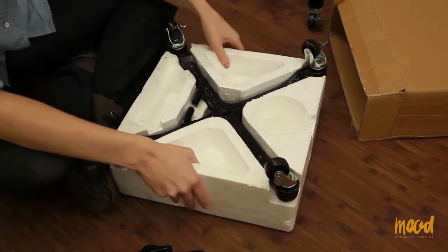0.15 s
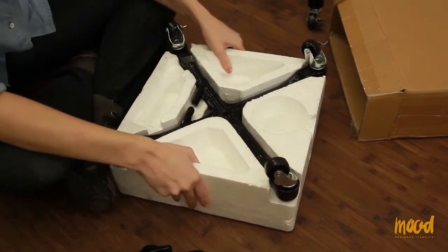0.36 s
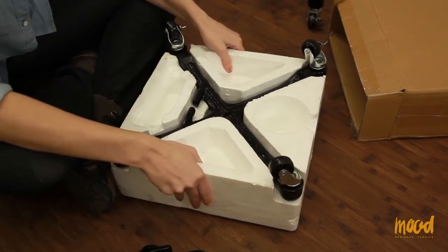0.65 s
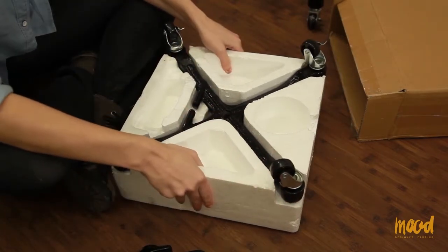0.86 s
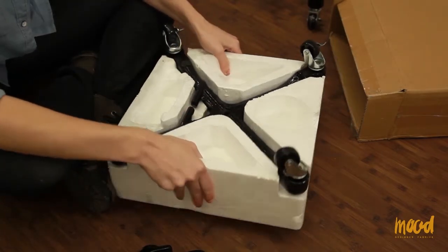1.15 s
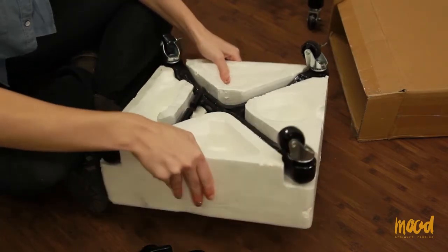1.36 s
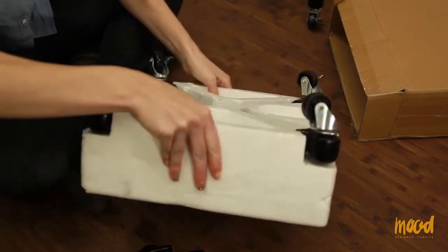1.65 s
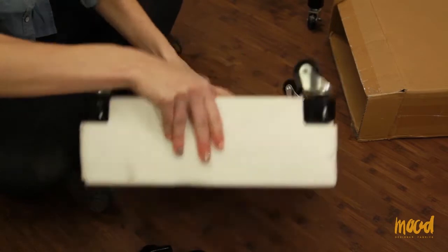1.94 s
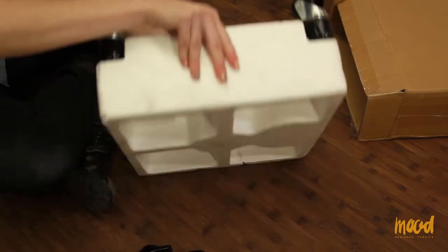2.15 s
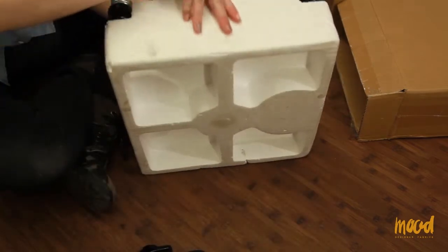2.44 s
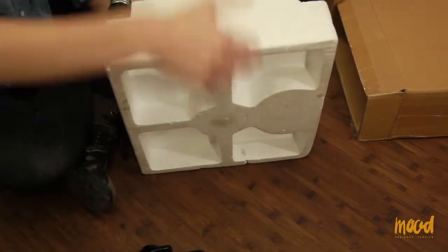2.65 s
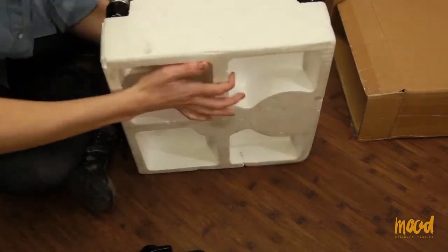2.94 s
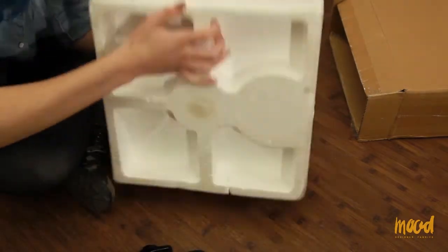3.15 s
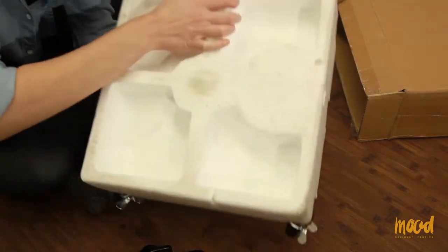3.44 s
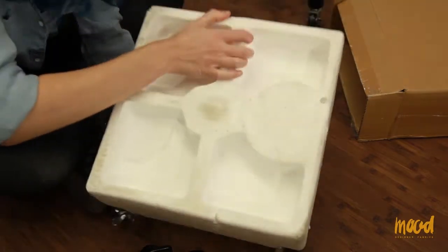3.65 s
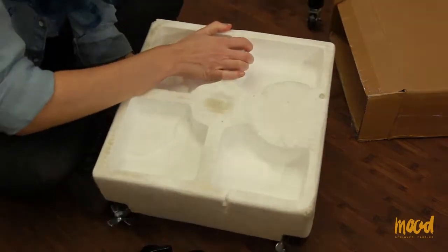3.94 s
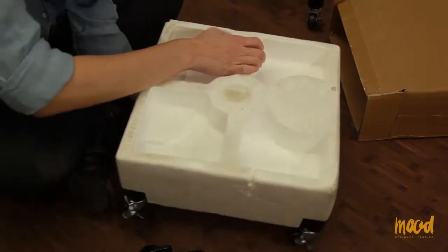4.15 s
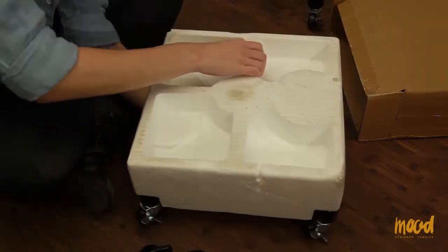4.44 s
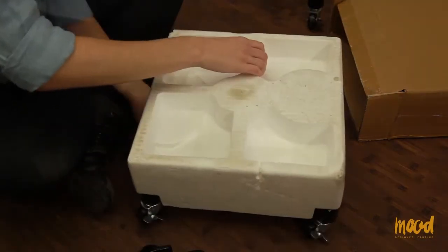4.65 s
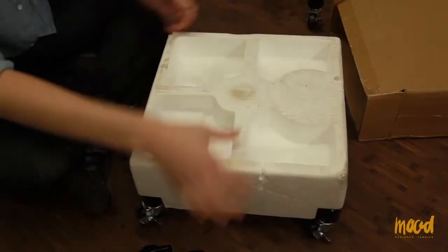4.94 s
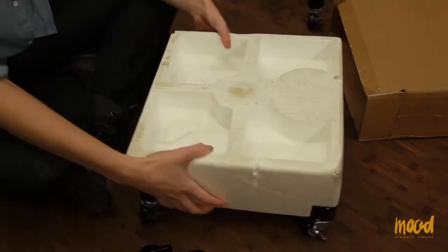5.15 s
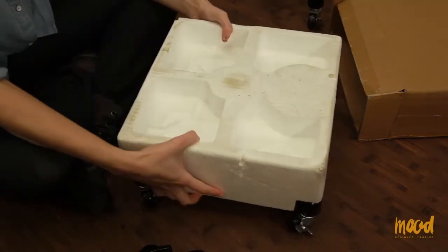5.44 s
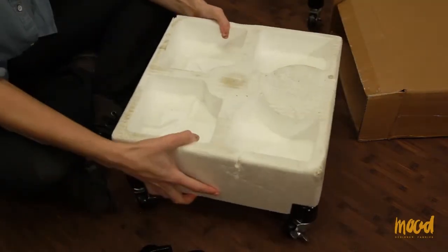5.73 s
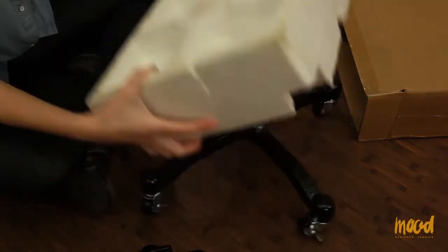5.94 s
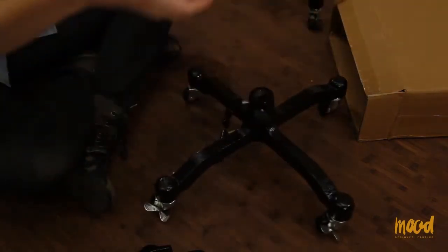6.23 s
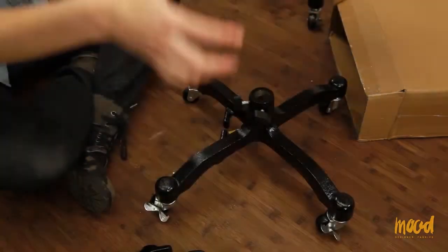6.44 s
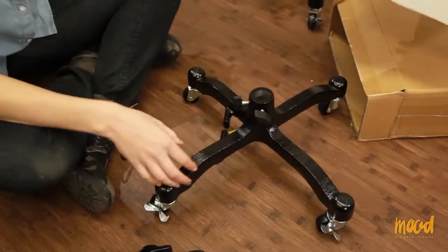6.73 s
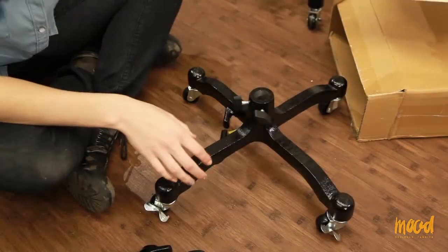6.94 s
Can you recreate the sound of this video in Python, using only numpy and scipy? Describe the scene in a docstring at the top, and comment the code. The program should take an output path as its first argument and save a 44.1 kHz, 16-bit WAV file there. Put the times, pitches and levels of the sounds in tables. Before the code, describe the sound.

A close view of handling in a quiet, lightly reflective room with steady low rumble and faint hiss. From 0 to 1.4 seconds, foam rubs dryly, with a sharp hollow clack near 0.4 and another, double-edged, near 0.9. At 1.8 a strong hollow knock starts the turning: uneven gritty scraping, brief squeaks near 2.3 to 2.6, and low floor thumps near 2.4 and 2.8. Rubbing swells at 3.05, a sharp tick falls at 3.4, then hard clacks at 3.6 and 4.07 as the load lands on the boards. Softer scuffing builds until 4.7. A dull bump at 5.04 begins heavier gripping and creaky rubbing, with a little squeak near 5.4, rising to a loud hollow pop at 5.85. A light swish follows at 6.2, a tiny tap at 6.7, then faint brushing to about 7.1.

```python
"""A quiet room: hands turn over a foam block packed round a wheeled base and lift it off.
Dense random slips hiss on the foam beads, scrape its walls and drum in its hollows.
Knocks ring its modes; ticks are short noise bursts, squeaks are gliding whistles; boards rumble and thud.
Echoes and a steady room tone lie round it. The opening repeats a stretch of handling heard again later."""
import sys
import numpy as np
from scipy import signal
from scipy.fft import rfft, irfft, next_fast_len
from scipy.io import wavfile
from scipy.ndimage import uniform_filter1d

SR = 44100
rng = np.random.default_rng(int(sys.argv[2]) if len(sys.argv) > 2 else 0)


def wav_record(signal):
    """Record a signal, one row per channel, as 16-bit PCM in the file named by sys.argv[1]."""
    frames = np.transpose(np.atleast_2d(signal))
    bounded = np.clip(frames, -1, 1)
    # unit amplitude maps onto the largest positive 16-bit level
    quanta = np.round(bounded * 32767).astype(np.int16)
    wavfile.write(sys.argv[1], SR, quanta)


N = 313063
SIZE = next_fast_len(N)
HZ = np.fft.rfftfreq(SIZE, 1 / SR)

# modes of the foam block: pitch_hz, level_db, t60_s
BLOCK_MODES = [(127, -8.5, 0.18), (248, -5, 0.078), (297.3, 3, 0.12), (332.7, 3, 0.2), (356.3, 3, 0.12),
               (435, -0.5, 0.05), (480.7, 0, 0.1), (579, -3.5, 0.061), (647, -4.5, 0.089), (704.5, -2, 0.1),
               (763.5, -3.5, 0.087), (874.6, 1.5, 0.056), (1005, -2, 0.051), (1132, 2.5, 0.061),
               (1377, -3.5, 0.039), (1790, -4, 0.22), (1940, -10, 0.025), (2760, -19.5, 0.09),
               (3220, 2, 0.028)]
# colour of the rubbed face, by posture of the block: pitch_hz, level_db_per_hz
ON_EDGE = [(320, -75), (550, 8), (789, 7.5), (1020, 1.5), (1160, 7.5), (1290, -1.5), (1430, 2), (2080, -5),
           (2520, -3.5), (3810, -15.5), (4740, -12), (6890, -8), (8690, -12), (11000, -8.5), (12000, -13.5),
           (15600, -49), (22000, -120)]
LAID_DOWN = [(320, -36), (550, -12.5), (730, -4.5), (810, -9), (1210, -2), (1710, -7), (2590, -9),
             (2830, -8), (3660, -15), (4440, -12), (5060, -28.5), (5460, -18.5), (7260, -28), (10400, -27),
             (12000, -27), (15600, -59), (22000, -120)]
SLID = [(320, -31), (550, 14), (886, 5.5), (958, 3), (1090, 4), (1800, -9.5), (1950, -8), (2330, -13),
        (2650, -9.5), (4010, -16.5), (4930, -18.5), (5680, -16), (7350, -17), (11000, -15.5), (12000, -23),
        (15600, -53), (22000, -120)]
LIFTED = [(320, -30), (550, 11), (602, 11), (685, 6.5), (910, 9), (1010, 0), (1120, 5), (1500, -6.5),
          (1760, -4.5), (2940, -11), (3570, -16.5), (4740, -21), (8050, -16.5), (11300, -11.5),
          (12000, -18), (15600, -52), (22000, -120)]


def gain_of(db):
    """Decibels to an amplitude factor."""
    return 10 ** (np.asarray(db) / 20)


def evened(x):
    """Scales to rms 1."""
    return x / np.sqrt(np.mean(x ** 2) + 1e-20)


def add(mix, start_s, sound):
    """Adds a sound to the mix in place, cut at the end."""
    part = mix[round(start_s * SR):][:len(sound)]
    part += sound[:len(part)]


def read(points):
    """A (Hz, dB) curve as a gain for every frequency, interpolated over log frequency."""
    point_hz, point_db = np.transpose(points)
    return gain_of(np.interp(np.log(HZ + 1), np.log(point_hz + 1), point_db))


def band(spectrum, lo_hz, hi_hz):
    """One band of a spectrum as sound of rms 1."""
    edges = np.sqrt((1 + (lo_hz / (HZ + 1)) ** 8) * (1 + (HZ / hi_hz) ** 8))
    return evened(irfft(spectrum / edges, SIZE)[:N])


def resonate(x, hz, width_hz):
    """Resonance of gain 1 on a moving pitch: shift it to zero, smooth, shift back."""
    turn = np.exp(2j * np.pi * np.cumsum(hz * np.ones(len(x))) / SR)
    pole = np.exp(-np.pi * width_hz / SR)
    smooth = signal.lfilter([1 - pole], [1, -pole], x / turn + 1e-18)
    return 2 * (turn * smooth).real


def swells(rows, levels_db, rest_db, swell_db):
    """Each row climbs swell_db in its rise and drops it in its fall; powers add over a rest level."""
    curve = 1.24  # above 1: dwells near the top, lets go quickly
    t = np.arange(0, N + 64, 64) / SR
    peak_s, rise_s, fall_s = (c[:, None] for c in np.transpose(rows)[:3])
    distance = np.maximum((peak_s - t) / rise_s, (t - peak_s) / fall_s)
    shape_db = -swell_db * distance ** curve
    power = (gain_of(levels_db[:, None] + shape_db) ** 2).sum(0) + gain_of(rest_db) ** 2
    return np.interp(np.arange(N) / SR, t, np.sqrt(power))


def room_tone():
    """Steady shaped noise: rumble of the building and a faint hiss."""
    # spectrum: pitch_hz, level_db_per_hz
    room_curve = [(12, -51), (20, -5), (59, 2), (159, -2), (197, -6), (226, -63), (321, -19), (420, -31),
                  (480, -12), (564, -15), (5000, -23), (11200, -32), (12500, -74), (16200, -97),
                  (22000, -120)]
    level_db = -49
    noise = rfft(rng.standard_normal(SIZE))
    return gain_of(level_db) * evened(irfft(noise * read(room_curve), SIZE)[:N])


def echoes(x, t60_s, dull_hz):
    """Reflections from floor, box and walls: sparse decaying taps, duller than the direct sound."""
    t = np.arange(SR // 2) / SR
    taps = rng.choice([-1., 1.], len(t)) * (rng.random(len(t)) < 2000 / SR)  # 2000 per second
    taps = taps * gain_of(-60 * t / t60_s) * (t > .003)
    taps = signal.lfilter(*signal.butter(1, dull_hz, fs=SR), taps)
    return signal.fftconvolve(x, taps / np.linalg.norm(taps))[:N]


def boards():
    """Low noise swells as the load rolls and lands on the floor boards."""
    # weight on the boards: heaviest_s, rise_s, fall_s, rumble_db
    rolls = [(1.43, .05, .06, -45), (1.53, 0.026, .08, -41.5), (1.78, 0.12, 0.12, -43),
             (1.94, 0.12, 0.035, -41), (2.33, 0.031, 0.031, -34.5), (2.41, 0.023, .3, -33),
             (2.81, 0.05, 0.056, -26.5), (3.05, 0.39, 0.078, -41), (3.23, 0.045, 0.033, -45),
             (3.6, 0.037, 0.014, -30), (3.7, .03, 0.05, -46), (3.95, 0.036, .3, -54.5),
             (4.079, 0.022, 0.014, -27.5), (4.42, 0.052, 0.11, -38.5), (4.64, 0.23, 0.32, -44),
             (5.05, 0.043, 0.12, -31.5), (5.25, 0.036, 0.12, -43), (5.49, 0.082, 0.068, -38),
             (5.6, 0.05, 0.29, -45), (5.85, 0.049, 0.044, -35)]
    rumble = band(rfft(rng.standard_normal(SIZE)), 76.0, 282.0)
    return swells(rolls, np.transpose(rolls)[3], rest_db=-59, swell_db=20) * rumble


def thud(level_db, pitch_hz, t60_s):
    """The boards flex and settle: a decaying sine with a soft onset."""
    t = np.arange(SR // 3) / SR
    onset = np.minimum(t / 0.011, 1)
    return gain_of(level_db - 60 * t / t60_s) * np.sin(2 * np.pi * pitch_hz * t) * onset


def squeak(length_s, from_hz, mid_hz, to_hz, level_db):
    """Slips lock into a rough whistle that follows sliding speed and clings to steps of the surface."""
    t = np.arange(0, length_s, 1 / SR)
    glide_hz = np.interp(t / length_s, [0, .5, 1], [from_hz, mid_hz, to_hz])
    step = 2 * np.pi * (glide_hz - 7200) / 1500
    hz = glide_hz - 200 * np.sin(step)
    cling_db = 2.0 * (np.cos(step) - 1)  # loudest where it clings
    rough = resonate(resonate(rng.standard_normal(len(t)), hz, 1000.0), hz, 1000.0)
    whistle = evened(rough) + .8 * np.sin(2 * np.pi * np.cumsum(hz) / SR)
    return gain_of(level_db + cling_db) * evened(whistle) * signal.windows.tukey(len(t), .4)


def tick(peak_db, pitch_hz):
    """A sharp slip or tap: a noise burst coloured by a small patch of surface, with a dry click."""
    t60_s, click_t60_s = 0.014, 0.0023
    snap_share, click_share = 0.24, 0.48
    t = np.arange(SR // 20) / SR
    noise = np.diff(rng.standard_normal(len(t) + 1))
    snap = evened(resonate(resonate(noise, pitch_hz, 3200.0), pitch_hz, 5300.0))
    tone = evened(resonate(resonate(noise, pitch_hz, 460.0), pitch_hz, 1060.0))
    burst = (snap_share * snap + tone) * gain_of(-60 * t / t60_s) * np.minimum(t / 0.00036, 1)
    click = (2 * rng.random(len(t)) - 1) * gain_of(-60 * t / click_t60_s)
    burst = burst / abs(burst).max() + click_share * click
    return gain_of(peak_db) * burst / abs(burst).max()


def knock(level_db, hollow_hz, wall_hz, wall_db, crack_db, ring):
    """A push rings the modes near the struck hollow and wall; the skin of the foam cracks briefly."""
    focus_db_per_octave, free_share = 30.5, 0.2
    t = np.arange(SR // 3) / SR
    hz, mode_db, t60_s = (c[:, None] for c in np.transpose(BLOCK_MODES))

    def near(spot_hz):
        """Modes fade with distance in octaves, up to 1.2."""
        return gain_of(-focus_db_per_octave * np.minimum(abs(np.log2(hz / spot_hz)), 1.2))

    share = near(hollow_hz) + gain_of(wall_db) * near(wall_hz)
    side = (-1) ** np.arange(len(hz))[:, None]  # neighbouring modes swing opposite ways
    fall_db = -60 * t / (t60_s * ring)
    decay = gain_of(2.56 * fall_db) + free_share * gain_of(fall_db)  # damped by contact, plus free ring
    modes = (side * share * gain_of(mode_db) * decay * np.sin(2 * np.pi * hz * t)).sum(0)
    modes = modes * np.minimum(t / 0.00025, 1)
    # the knock carries nothing below about 90 Hz
    modes = signal.lfilter(*signal.butter(2, 90, "high", fs=SR), modes)
    crack = resonate(rng.standard_normal(len(t)), 1380.0, 930.0)
    crack = crack * gain_of(-60 * t / 0.062) * np.minimum(t / 0.001, 1)
    return gain_of(level_db) * (modes / abs(modes).max() + gain_of(crack_db) * crack / abs(crack).max())


def slips(per_s, spread_db, flutter_db, flutter_ms):
    """Beads let go at random moments with uneven force, while the grip flutters."""
    force = gain_of(spread_db * np.minimum(rng.exponential(1, N), 3.0)) * rng.standard_normal(N)
    span = int(flutter_ms * SR / 1000)
    grip = evened(uniform_filter1d(uniform_filter1d(rng.standard_normal(N), span), span))
    return force * (rng.random(N) < per_s / SR) * gain_of(flutter_db * grip)


def patchy(x, depth_db, wide_hz, long_ms):
    """Each patch of foam under the contact favours other pitches for a moment."""
    hz, t, spectra = signal.stft(x, SR, nperseg=512, noverlap=384)
    field = rng.standard_normal(spectra.shape[::-1]).T
    for _ in range(2):
        field = uniform_filter1d(field, max(int(wide_hz / hz[1]), 1), 0)
        field = uniform_filter1d(field, max(int(long_ms / 1000 / t[1]), 1), 1)
    coloured = spectra * gain_of(depth_db * evened(field))
    return signal.istft(coloured, SR, nperseg=512, noverlap=384)[1][:N]


def rubbing():
    """One stream of slips drives the beads, the walls and the hollows by changing amounts."""
    # strokes: hardest_s, rise_s, fall_s, pressure_db, then against the pressure: hiss_db, wall_db, hollow_db
    strokes = [(1.451, 0.035, 0.55, -50.5, -2, 3, 4.5), (1.536, 0.011, 0.054, -33, 6.5, -4, 0.5),
               (1.564, 0.033, 0.024, -39.5, 6.5, 1, 7), (1.62, .06, .04, -54, 0, -2, 5),
               (1.656, 0.0069, 0.25, -43.5, -2.5, 6, -12), (1.772, 0.082, 0.041, -32, 3.5, -3.5, 1.5),
               (1.835, .03, 0.17, -36.5, 1, -22, 6), (2.04, 0.29, 0.19, -34.5, -4, -4.5, -6),
               (2.1, 0.13, 0.13, -31.5, 1.5, -5.5, -12), (2.155, 0.09, .03, -36, 1, -2, -3),
               (2.2, 0.092, 0.18, -39.5, -8, -0.5, 2), (2.295, 0.053, 0.059, -29, -1, -1.5, -9),
               (2.329, 0.046, .06, -37.5, -4, 7.5, 7.5), (2.407, .008, .03, -35, -12, 1, -14),
               (2.419, 0.036, 0.036, -35.5, 1, 2, -16), (2.497, 0.13, 0.046, -33, 1, 0.5, -12),
               (2.54, .04, 0.055, -32, -2.5, -14, -1.5), (2.59, 0.042, 0.054, -36, 5.5, -1.5, -6),
               (2.617, 0.02, 0.033, -31, -13, -10, 0), (2.67, 0.057, 0.07, -50, -5, -1, 8.5),
               (2.765, .03, 0.065, -41, -8, 1, 1), (2.812, 0.061, 0.063, -31.5, -2, -2, 2.5),
               (2.91, 0.16, 0.11, -37.5, -2, 0, -8), (2.96, 0.067, 0.093, -46.5, 8.5, -4, 14),
               (3.045, 0.14, 0.074, -28, 1.5, 0, -15), (3.184, 0.17, 0.037, -37, 1.5, 3.5, -0.5),
               (3.273, 0.14, 0.13, -39, 1, 9.5, 5), (3.335, 0.025, 0.018, -53, -2, 17, 6),
               (3.365, 0.022, 0.13, -37, 0.5, 10, 1), (3.428, 0.021, 0.035, -38.5, 1, 16, 4),
               (3.453, 0.038, 0.066, -29, -2, 3.5, -22), (3.487, .04, 0.044, -31, -7.5, -6.5, -23),
               (3.53, 0.022, 0.3, -40, -13.5, 4, -3), (3.629, 0.097, 0.073, -38.5, -0.5, -2, 11.5),
               (3.68, 0.072, 0.074, -41.5, -7, -6, 4), (3.728, 0.11, 0.019, -40, -6, 5, 5),
               (3.865, 0.062, 0.088, -59, -3, 0, 14), (3.97, .08, 0.33, -46.5, -3.5, -0.5, -18),
               (4.035, 0.039, 0.06, -50, -4, 8, 13), (4.16, 0.032, 0.094, -55, 1, 0, 17),
               (4.281, 0.16, 0.38, -38.5, -1.5, -3, 0.5), (4.386, 0.13, 0.073, -43, 2, 11.5, 12.5),
               (4.45, 0.16, 0.2, -39.5, -1, -15, -7), (4.545, 0.28, 0.15, -39.5, 3, 6.5, 2),
               (4.594, 0.12, 0.052, -37.5, 1, 10.5, 9.5), (4.633, 0.13, 0.069, -32.5, 0.5, 3, 0.5),
               (4.697, .006, .02, -41, -3, 17.5, -8), (4.711, 0.037, 0.017, -41, 5, 14.5, -29),
               (4.734, 0.084, 0.044, -48.5, -17, 10.5, 2), (4.885, .2, .2, -56, -16, -17, -17),
               (5.005, 0.0064, 0.16, -35.5, -6.5, -22, -8), (5.044, 0.028, .03, -27.5, -7.5, 1, 5),
               (5.095, 0.038, 0.36, -36.5, -13.5, -13, -4), (5.147, 0.018, 0.042, -30.5, -13, -3, 5),
               (5.12, .02, .02, -43, -10, -7, 14), (5.2, 0.15, 0.28, -41, -6, -17, -9),
               (5.37, 0.17, 0.25, -35, -19, 2, -4), (5.445, 0.12, 0.061, -29, -9, -7, -24),
               (5.487, .03, 0.072, -24.5, -11.5, -0.5, -5.5), (5.626, 0.076, 0.27, -34, -11, -1, -2.5),
               (5.7, 0.057, 0.09, -33.5, -11, -10, -17), (5.8, 0.12, 0.11, -27, -7.5, 1, -7),
               (5.844, 0.064, 0.038, -26, 3.5, -3, -4), (5.915, 0.061, 0.081, -46, -3.5, 13.5, -9),
               (6.01, 0.07, 0.04, -63, 3, 16, -2), (6.11, 0.058, .06, -44, -8, -9, -11.5),
               (6.163, 0.069, 0.085, -33, -1, -7, -23), (6.203, 0.082, 0.026, -36, 0, -3.5, -17),
               (6.25, 0.068, 0.068, -53, -14, 8, -10), (6.37, 0.093, 0.12, -50.5, -20, 2, -14),
               (6.46, 0.17, 0.23, -46, -7.5, -3, -25), (6.6, 0.25, 0.29, -48.5, -7.5, -4, -21),
               (6.696, 0.0031, 0.025, -46.5, 1, 8, -14), (6.85, .02, 0.041, -59, 3, 5, 2),
               (6.9, .07, 0.16, -49.5, -1.5, 0, -8), (6.97, .06, 0.085, -60, -5, 5, 6),
               (7.086, 0.26, 0.049, -45, 0, 6.5, -9)]
    # postures of the block: from_s, face, ribs key, fizz_db against hiss
    postures = [(0, ON_EDGE, "on edge", -2.1), (3.231, LAID_DOWN, "laid down", 0.5), (3.9, SLID, "slid", 2),
                (4.9, LIFTED, "lifted", 2.5), (5.6, LIFTED, "lifted", -1.5),
                (6.26, LIFTED, "lifted", -10.5)]
    # thin ribs that sing out, by posture: pitch_hz, width_hz, gain_db over the face
    ribs = {"on edge": [(2400, 190, -65), (5170, 240, -8), (6600, 83, -2)],
            "laid down": [(2930, 440, -13.5), (4360, 380, -10), (5060, 110, 16), (7800, 300, -6)],
            "slid": [(2920, 380, -29), (4810, 230, 3), (7180, 230, -6)], "lifted": [(2280, 530, -23),
            (3200, 130, -11), (7240, 76, 2), (8370, 160, -2)]}
    # hands at rest: hiss_db, fizz_db, rasp_db, wall_db, hollow_db
    touch_db = [-105, -123, -68, -59.5, -60]
    # climb in a rise, drop in a fall: hiss_db, fizz_db, rasp_db, wall_db, hollow_db
    swell_db = [24.2, 25.5, 25, 30.8, 29.8]
    fizz_db_per_hiss_db = 1.02

    press_db, hiss_db, wall_db, hollow_db = np.transpose(strokes)[3:]
    against_db = [hiss_db, fizz_db_per_hiss_db * hiss_db, 0 * press_db, wall_db, hollow_db]
    hiss, fizz, rasp, wall, hollow = (
        swells(strokes, press_db + part_db, rest_db, climb_db)
        for part_db, rest_db, climb_db in zip(against_db, touch_db, swell_db))

    fine = slips(per_s=12000, spread_db=0.5, flutter_db=0.65, flutter_ms=34.0)
    grit = slips(per_s=700, spread_db=1.5, flutter_db=2.5, flutter_ms=25.0)  # sparser, harder
    drive = evened(fine) + 0.3 * evened(grit)
    beads = rfft(patchy(drive, depth_db=3.0, wide_hz=261.5, long_ms=28.0), SIZE)
    drive = rfft(drive, SIZE)

    modes = 0
    for k, (hz, db, t60_s) in enumerate(BLOCK_MODES):
        width_hz = 3.05 / t60_s + 15  # the gripping hand damps the modes
        modes = modes + (-1) ** k * gain_of(db) / (1 + 2j * (HZ - hz) / width_hz)

    out = np.zeros(N)
    for from_s, face_points, posture, fizz_db in postures:
        rib_gain = sum(gain_of(db) / (1 + (2 * (HZ - hz) / width_hz) ** 2)
                       for hz, width_hz, db in ribs[posture])
        face = read(face_points) * (1 + rib_gain)
        surface = hiss * band(beads * face, 4000, 7000)
        surface += fizz * gain_of(fizz_db) * band(beads * face, 7000, 13000)
        surface += rasp * band(beads * face, 1400, 4000)
        surface += wall * band(drive * face * (0.27 + modes), 523, 1167)
        start = round(from_s * SR)
        out[start:] = surface[start:]  # holds until the next posture
    return out + hollow * band(drive * modes, 129, 590)


def scene():
    """All handling sounds in the room, with a later stretch also laid over the start."""
    # load landing on the floor: start_s, level_db, pitch_hz, t60_s
    thuds = [(1.791, -22, 217, 0.1), (2.408, -30, 127, 0.16), (2.766, -15.5, 122, 0.11),
             (2.804, -23, 125, 0.12), (3.583, -27, 220, 0.1), (4.069, -22, 213, 0.1),
             (5.036, -18.5, 227, 0.14), (5.134, -28, 213, 0.11), (5.474, -25, 124, 0.067),
             (6.693, -35, 127, 0.11)]
    # squeaks: start_s, length_s, from_hz, mid_hz, to_hz (before clinging), level_db
    squeaks = [(2.282, 0.02, 4720, 6380, 8000, -16.5), (2.418, 0.0107, 6230, 8800, 8950, -23.5),
               (2.572, .018, 5700, 8000, 6200, -24), (2.59, 0.0195, 6300, 7230, 7300, -22),
               (3.19, .03, 6400, 9870, 11500, -36), (3.332, 0.051, 11880, 6300, 4380, -31.5),
               (5.385, 0.055, 5520, 10030, 4600, -28.5), (5.449, .013, 7660, 8600, 10700, -28)]
    # sharp slips and taps: start_s, peak_db, pitch_hz
    ticks = [(1.4826, -44.5, 2500), (1.793, -21, 5150), (1.8297, -29, 7740), (2.4539, -21, 5700),
             (2.691, -31, 6600), (2.7408, -41, 5200), (2.7522, -42, 8100), (2.7697, -40, 2600),
             (2.8094, -20, 6200), (3.361, -11, 4640), (3.4245, -18, 4400), (3.5844, -5, 4030),
             (3.701, -22, 3250), (3.728, -30, 4300), (3.79, -41.5, 3190), (4.0675, -14.5, 4550),
             (4.0703, -11.5, 3850), (4.1236, -36, 2990), (4.704, -26, 6110), (5.005, -37, 3330),
             (5.035, -18, 2580), (5.0433, -26, 4230), (5.0879, -39, 3330), (5.1422, -34, 3490),
             (5.4799, -18, 7340), (5.7705, -22, 3010), (5.8574, -26, 2700), (5.875, -16, 3020),
             (5.9115, -26, 2980), (5.9564, -38, 2500), (6.695, -32, 9000)]
    # blows: listed_s, level_db, hollow_hz, wall_hz, wall_db (re hollow), crack_db (re modes),
    # ring (t60 factor)
    knocks = [(1.48, -29, 407, 650, 5, -7, 1.3), (1.513, -31, 382, 694, 11, -4, 1.3),
              (1.66, -28.5, 290, 850, 31, -11, 7.5), (1.792, 0.9, 272, 876, -11, -11, 0.46),
              (1.833, -22, 290, 620, 5, -16, 0.74), (1.93, -22, 283, 646, -4, -19, 1.1),
              (2.304, -16, 322, 630, -4, -14, 0.74), (2.372, -20, 330, 563, -22, -13, 0.45),
              (2.408, -24.5, 287, 888, -16, -22, 1.1), (2.767, -24.5, 234, 1330, -20, 3, 0.71),
              (2.776, -20.5, 193, 670, 7, -5, 0.27), (2.802, -14, 570, 990, 3, -15, 1.1),
              (2.81, -21, 312, 1050, 18, -15, 0.58), (2.956, -21, 305, 790, -22, -17, 1.1),
              (3.039, -17.5, 333, 789, -25, -18, 0.47), (3.057, -17, 310, 1150, 8, -17, 1.7),
              (3.098, -23.5, 315, 1170, -18, -20, 0.85), (3.37, -18, 290, 1090, 11, -12, 2.6),
              (3.526, -30, 470, 969, 0, -18, 1.01), (3.585, -2.5, 272, 1030, -0.5, -8, 0.67),
              (3.657, -27, 326, 1140, -28.5, 1, 1.6), (3.787, -34, 440, 638, -5.5, -20, 0.61),
              (4.027, -31.5, 324, 623, -12.5, -21, 0.47), (4.072, -4, 469, 1016, -8, -8.5, 2.1),
              (4.139, -13, 353, 1135, -14.5, -35, 2.2), (4.186, -25, 349, 563, -13, -28.5, 0.46),
              (4.383, -20.5, 370, 575, -61, -32, 0.62), (4.69, -34, 407, 780, -20, -7, 1.5),
              (5.012, -25, 390, 855, -1, -10, 0.85), (5.0405, -11.5, 398, 748, -1.5, -2, 0.68),
              (5.137, -18, 440, 940, -5, -18, 1.1), (5.295, -26, 384, 870, -2, -4, 0.86),
              (5.472, -30, 434, 610, -11, -15, 1.8), (5.597, -18.5, 367, 864, -3, -12, 0.63),
              (5.854, -4, 576, 787, 6.5, -4, 2.05), (6.693, -41, 510, 595, 3, -13, 1.4)]
    knock_delay_s = 0.00233  # knocks start this much after their listed times
    repeat_from_s, repeat_length_s = 3.21154, 1.433

    foam = rubbing() + boards()
    for listed_s, *row in knocks:
        add(foam, listed_s + knock_delay_s, knock(*row))
    for start_s, *row in thuds:
        add(foam, start_s, thud(*row))
    for start_s, *row in ticks:
        add(foam, start_s, tick(*row))
    for start_s, *row in squeaks:
        add(foam, start_s, squeak(*row))
    mix = foam + gain_of(-20) * echoes(foam, t60_s=0.38, dull_hz=2570) + room_tone()
    start, length = round(repeat_from_s * SR), round(repeat_length_s * SR)
    return np.concatenate([mix[start:start + length], mix[length:]])[None]


def record(dry):
    """Softly clips the loudest peaks, then limits the band."""
    ceiling, edge_hz = gain_of(1.5), 11850
    soft = ceiling * np.tanh(dry / ceiling)
    lowpass = signal.firwin(511, edge_hz, window=("kaiser", 9), fs=SR)
    return signal.oaconvolve(soft, lowpass[None], "same")


dry = scene()
out = record(dry)
wav_record(out)
```